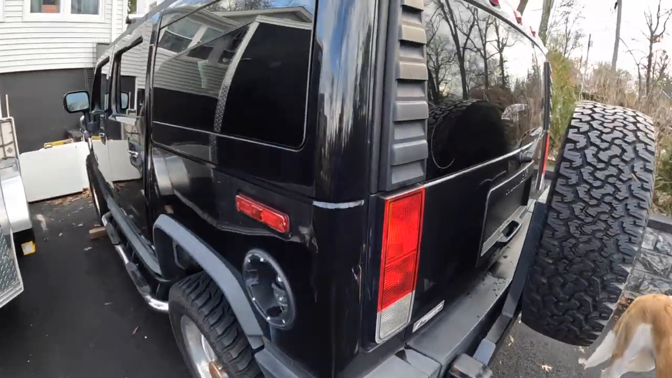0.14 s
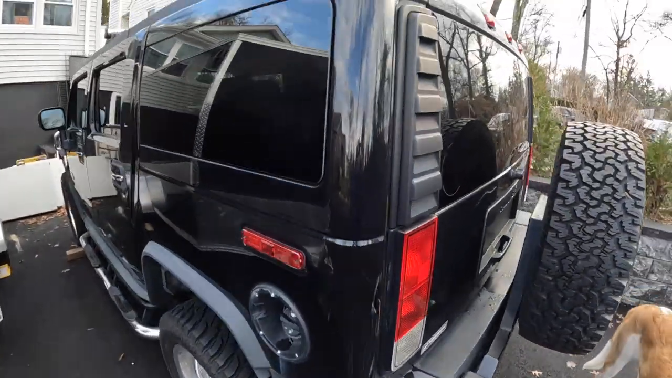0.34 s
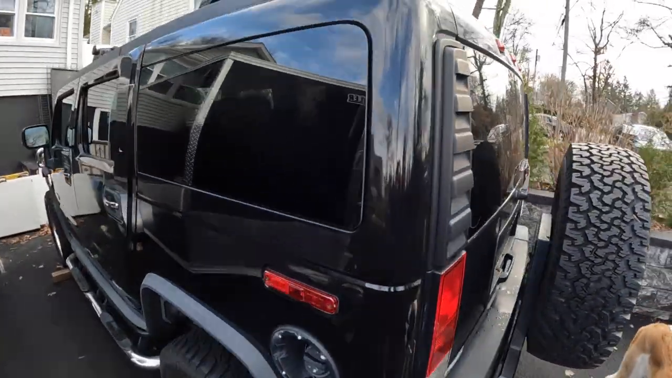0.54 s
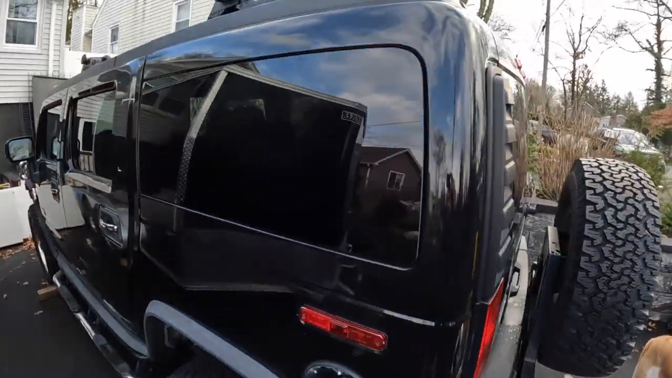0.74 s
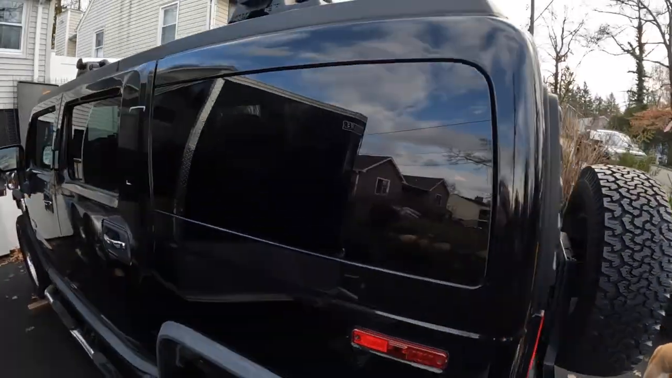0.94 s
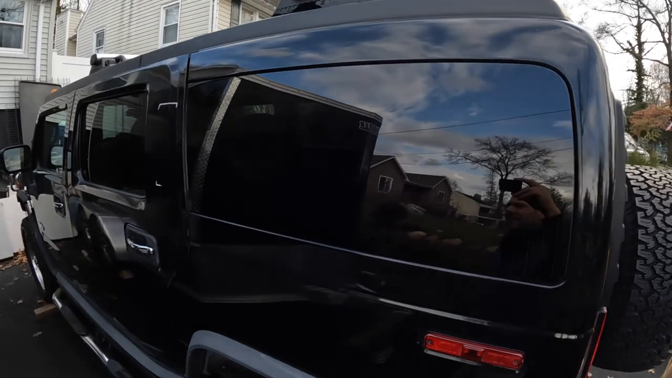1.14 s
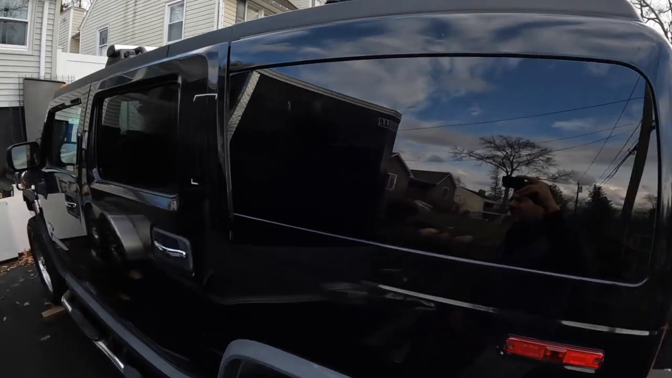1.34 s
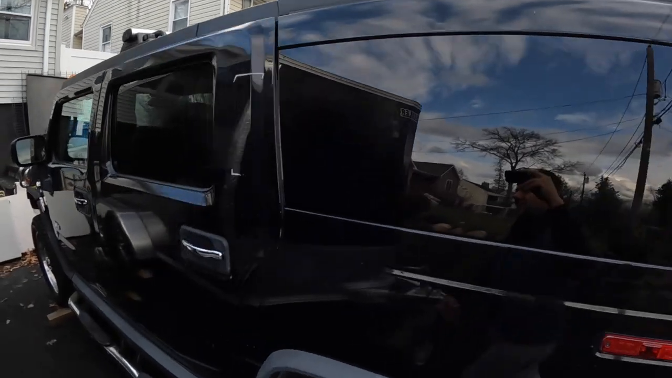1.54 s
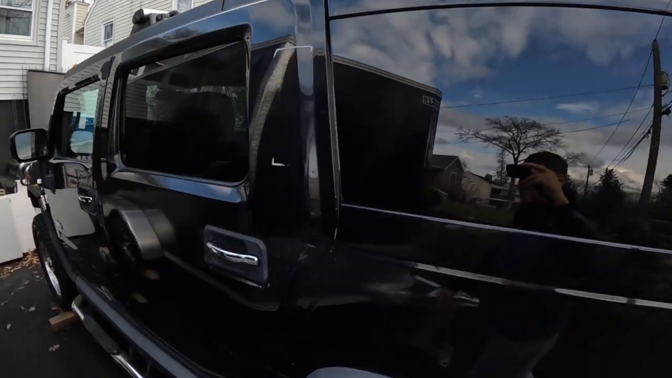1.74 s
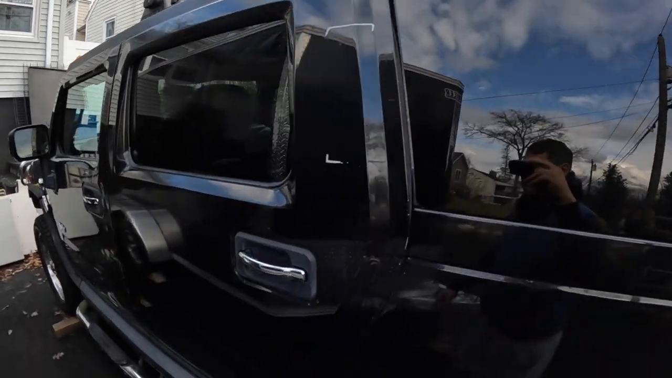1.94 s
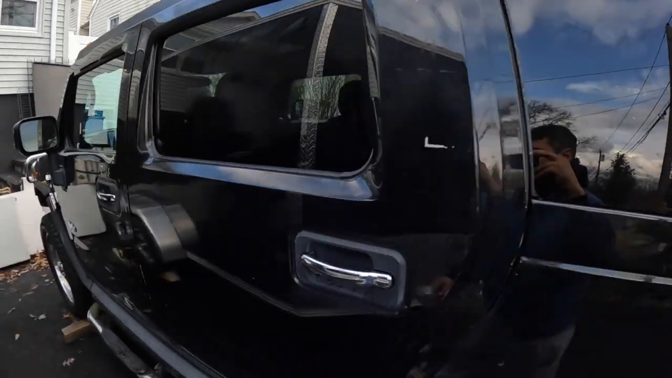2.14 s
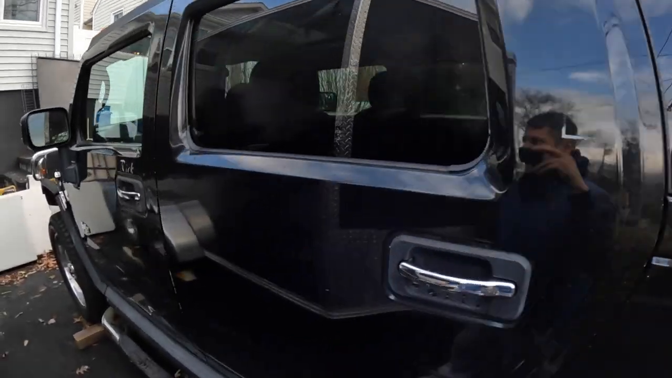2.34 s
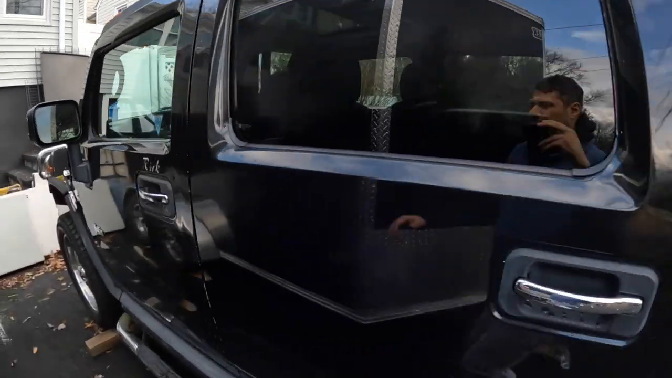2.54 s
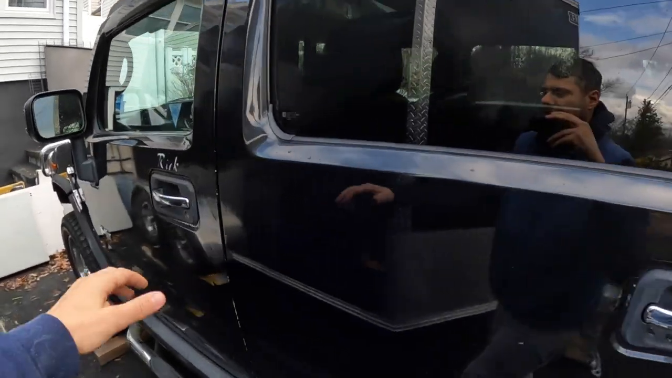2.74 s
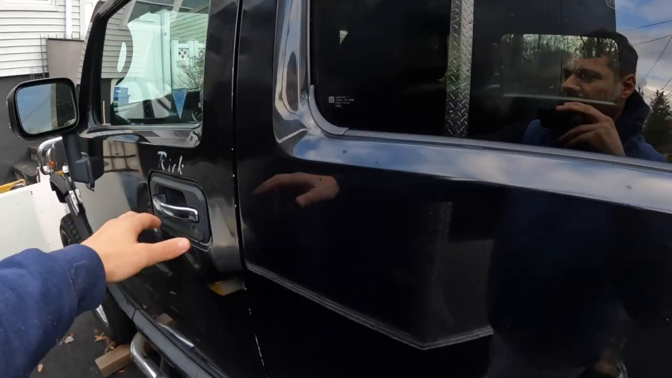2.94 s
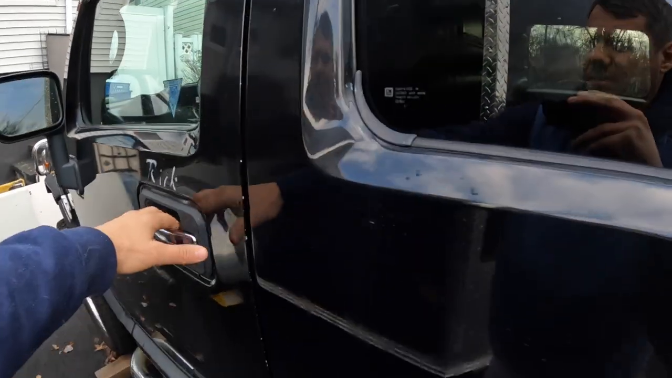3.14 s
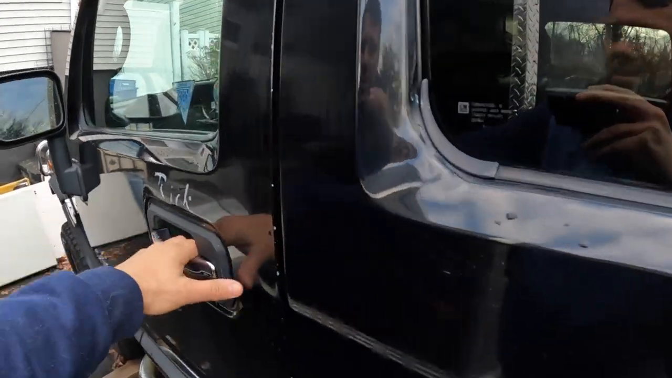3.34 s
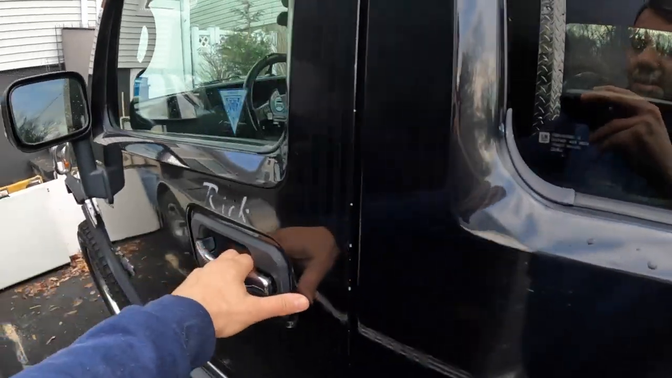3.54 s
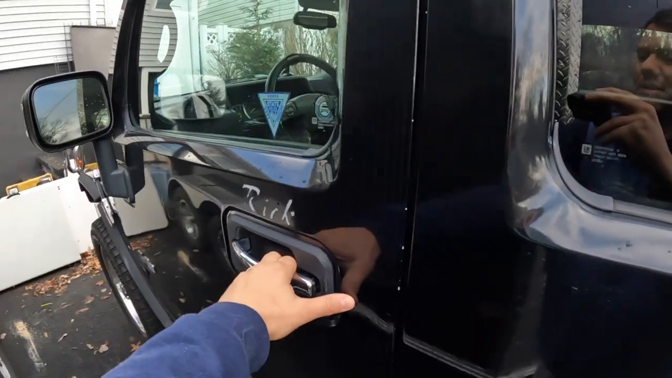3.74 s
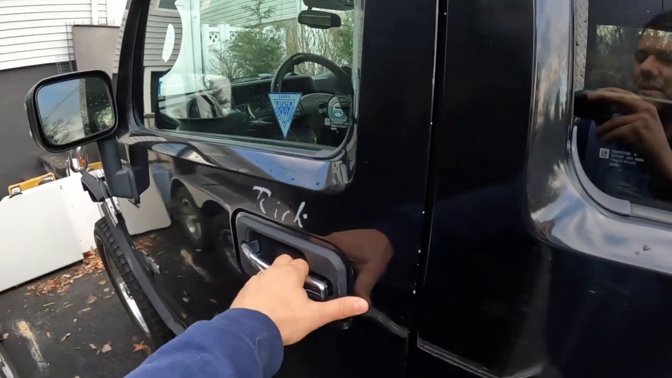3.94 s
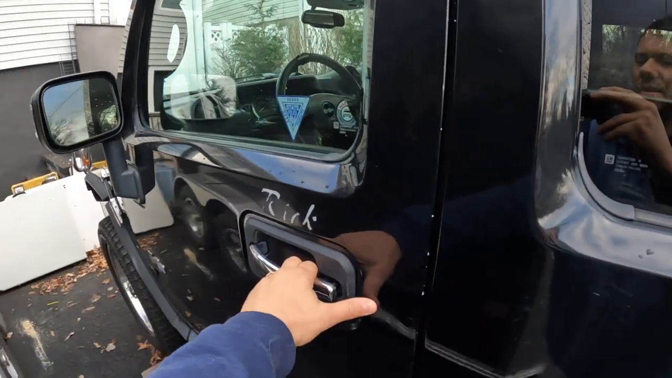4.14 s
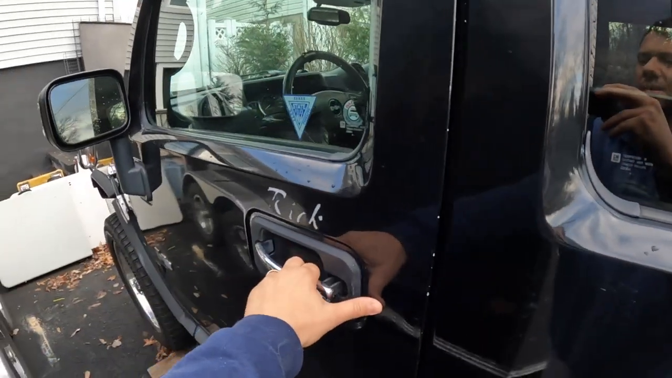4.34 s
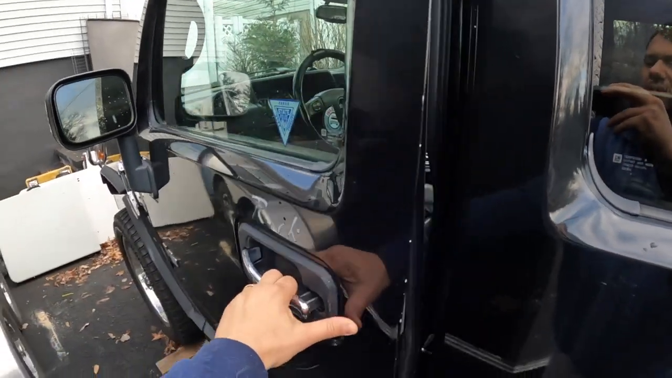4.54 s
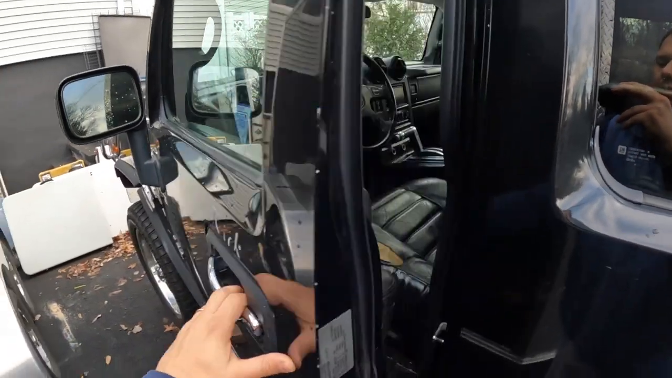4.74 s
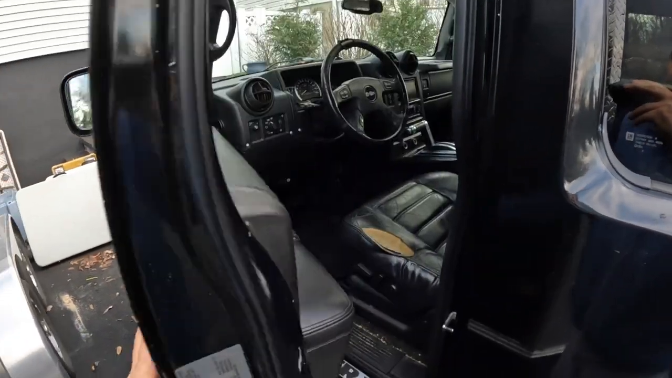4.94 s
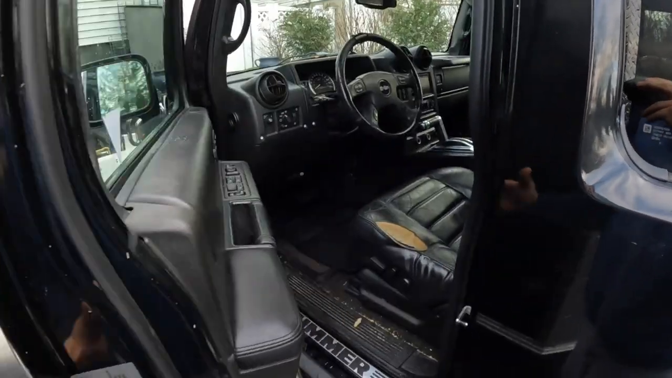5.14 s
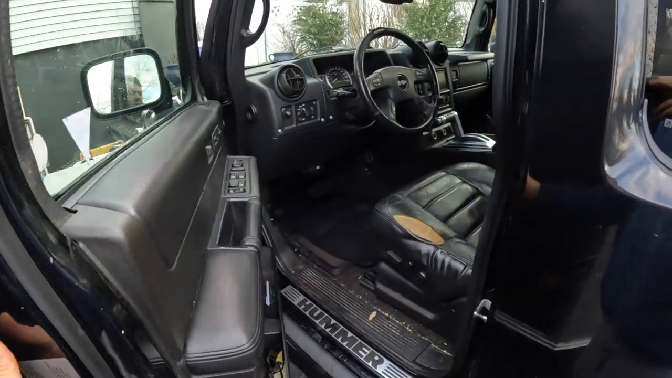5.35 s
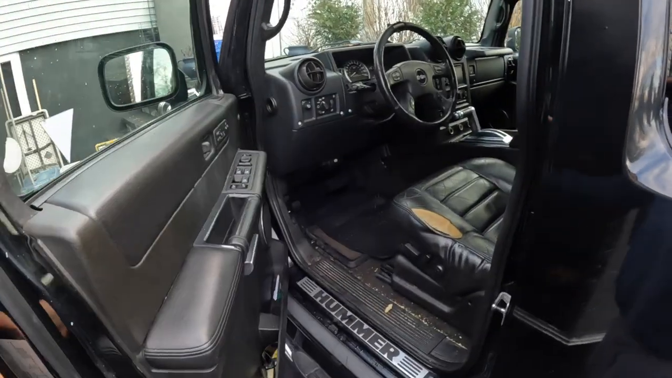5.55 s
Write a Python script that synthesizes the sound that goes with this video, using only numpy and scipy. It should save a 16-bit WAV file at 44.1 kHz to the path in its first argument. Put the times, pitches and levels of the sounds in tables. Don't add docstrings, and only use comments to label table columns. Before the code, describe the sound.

Footsteps crunch dry leaves and twigs beside a large vehicle, then its door handle thumps, the latch springs free and the door swings open over distant traffic.

```python
import sys
import numpy as np
from scipy import signal
from scipy.io import wavfile

SR = 44100
rng = np.random.default_rng(int(sys.argv[2]) if len(sys.argv) > 2 else 0)


def pcm_store(signal):
    levels = np.round(np.clip(np.atleast_2d(signal), -1, 1) * 32767)
    wavfile.write(sys.argv[1], SR, levels.astype(np.int16).T)


def gain_from_db(level_db):
    decades = np.asarray(level_db, float) / 20
    return 10 ** decades


N = 246166


def in_time(rows):
    s, *columns = np.transpose(rows)
    return [np.interp(np.arange(N) / SR, s, c) for c in columns]


def at_hz(points, hz):
    known_hz, value = np.transpose(points)
    return np.interp(np.log(hz), np.log(known_hz), value)


def rms_one(x):
    return x / np.sqrt(np.mean(x ** 2) + 1e-20)


def drift(rate):
    r = np.exp(-80 * np.pi * rate / SR)
    noise = rng.standard_normal(N // 40 + 2002)
    slow = signal.lfilter([1], [1, -2 * r, r * r], noise)[2000:]
    return np.interp(np.arange(N) / 40, np.arange(len(slow)), rms_one(slow))


def ring(x, hz, t60):
    r = gain_from_db(-60 / (t60 * SR))
    w = 2 * np.pi * hz / SR
    return signal.lfilter([0, np.sin(w)], [1, -2 * r * np.cos(w), r * r], x)


def add(out, sound, s, pan_db):
    start = round(s * SR)
    piece = out[:, start:start + len(sound)]
    piece += sound[:piece.shape[1]] * gain_from_db([[pan_db / 2], [-pan_db / 2]])


def grains(size, spread_db):
    uneven = np.minimum(rng.exponential(1, size[-1]), 4)
    return rms_one(rng.standard_normal(size) * gain_from_db(spread_db * uneven))


def coloured(white, spectrum, patchy_db):
    # (frequency [Hz], likeness [-1..1])
    likeness = [(25, 0.77), (60, 1), (180, 0.99), (550, 0.9), (1650, 0.6), (4970, 0.62), (15000, 0.41)]
    edges = 14 * 2 ** np.arange(0, 10.2, .5)
    out, together = 0, drift(1.0)
    lowest_hz, highest_hz = np.array(spectrum)[[0, -1], 0]
    for k, (low, high) in enumerate(zip(edges, edges[1:])):
        hz = np.sqrt(low * high)
        if not lowest_hz * .7 < hz < highest_hz * 1.3:
            continue
        noise = white[k % 2]
        run_in = np.hstack([noise[:, -6000:], noise])
        band = signal.butter(3, [low, high], "band", fs=SR, output="sos")
        mid, side = signal.sosfilt(band, run_in)[:, -N:]
        alike = np.clip(at_hz(likeness, hz), -1, 1)
        gain = gain_from_db(at_hz(spectrum, hz) + patchy_db * (0.1 * together + drift(7.14)))
        out = out + gain * (np.sqrt(1 + alike) * mid + np.sqrt(1 - alike) * side * [[1], [-1]])
    return rms_one(out)


def surges(rows, rise_db_per_s, fall_db_per_s, still_db):
    t, power = np.arange(0, N + 64, 64) / SR, gain_from_db(still_db) ** 2
    for s, hold_s, db in rows:
        rise_db = rise_db_per_s * np.maximum(s - t, 0)
        fall_db = fall_db_per_s * np.maximum(t - s - hold_s, 0)
        power = power + gain_from_db(db - rise_db - fall_db) ** 2
    return np.interp(np.arange(N) / SR, t, np.sqrt(power))


def blows(hits, modes, rattle, pan_db):
    longest_s = max(np.array(hits)[:, 4].max(), np.array(modes)[:, 2].max())
    t = np.arange(int(longest_s * SR)) / SR
    out, shake = np.zeros((2, N)), np.zeros((2, N))
    for s, peak_db, contact_hz, rattle_db, t60 in hits:
        push = t * np.exp(-2 * np.pi * contact_hz * t)
        push = push / push.sum() + 1e-18
        strengths = gain_from_db(np.array(modes)[:, 1] + rng.normal(0, 1.5, len(modes)))
        strengths = strengths * (-1) ** np.arange(len(modes))
        sound = sum(g * ring(push, hz, ring_s) for g, (hz, _, ring_s) in zip(strengths, modes))
        add(out, gain_from_db(peak_db - 8.5) * sound, s, pan_db)
        swell = 1 - np.exp(-contact_hz * t)
        add(shake, swell * gain_from_db(peak_db + rattle_db - 60 * t / max(t60, .005)), s, pan_db)
    return out + shake * rattle


def traffic():
    # (frequency [Hz], density [dB per Hz])
    rumble_colour = [(8.8, -30), (15, 4), (59, -5.5), (75, 0), (102, -10.5), (150, -6), (200, -57.5),
                     (330, -120)]
    drone_colour = [(130, -8.5), (188, 3), (266, -3), (377, -6.5), (533, -13)]
    roar_colour = [(377, -12.5), (533, 3.5), (753, 2), (1065, 0.5), (1500, -8), (2130, -38.5),
                   (3000, -42.5), (4300, -52), (6000, -30.5), (8500, -36.5), (12000, -50.5), (15000, -52.5)]
    # (time [s], roar level [dB])
    road = [(0.0, -50.5), (0.46, -52.5), (0.93, -49), (1.15, -52), (2.27, -52), (2.38, -50), (3.79, -54.5),
            (4.65, -51), (5.11, -55), (5.58, -52.5)]
    # (time [s], rumble level [dB])
    lorry = [(0, -38.5), (.42, -40.5), (.9, -39), (2.8, -38), (3.7, -35.5), (4.1, -39.5), (4.9, -35.5),
             (5.2, -41.5), (5.58, -41.5)]
    # (time [s], hold [s], pitch [Hz], level [dB])
    motor = [
        (0.174, 0.16, 359.4, -48.5),
        (1.445, 0.32, 386.5, -56.5),
    ]
    (roar_db,), (rumble_db,) = in_time(road), in_time(lorry)
    drone_db = -47 + 0.66 * (roar_db - roar_db.mean()) + 0.054 * (rumble_db - rumble_db.mean())
    white = rng.standard_normal((2, 2, N))
    rumble = gain_from_db(rumble_db) * coloured(white, rumble_colour, patchy_db=0.5)
    drone = gain_from_db(drone_db) * coloured(white[::-1], drone_colour, patchy_db=2.0)
    roar = gain_from_db(roar_db - 1.04) * coloured(white, roar_colour, patchy_db=2.0)
    flutter, t, hum = gain_from_db(3.5 * drift(9.4)), np.arange(N) / SR, 0
    for s, hold_s, hz, db in motor:
        level = surges([(s, hold_s, db)], rise_db_per_s=161, fall_db_per_s=250, still_db=-120)
        hum = hum + level * np.sin(2 * np.pi * hz * t)
    halves = np.array([[.5], [-.5]])
    rumble_pan_db, road_pan_db = -0.1, 1.6
    return (rumble + drone) * gain_from_db(rumble_pan_db * halves) + (roar + flutter * hum) * gain_from_db(road_pan_db * halves)


def rustle():
    # (frequency [Hz], density [dB per Hz])
    brush_colour = [(710, -44.5), (1200, -12), (2050, -6), (2280, 1.5), (2570, -7.5), (6370, -11.5),
                    (7170, 3.5), (8790, -21), (12200, -19.5), (15500, -44)]
    # (time [s], hold [s], level [dB], treble over level [dB])
    strokes = [(0, .08, -65, -9), (0.125, 0.18, -68.5, -6), (0.36, 0.076, -64.5, -9),
               (0.475, 0.072, -60, -12), (0.633, 0.19, -72.5, -4.5), (0.834, 0.35, -65, -6.5),
               (1.266, 0.15, -59.5, -13.5), (1.552, 0.012, -68.5, -4), (1.675, 0.17, -62, -10.5),
               (1.9, 0.16, -74.5, -13), (2.124, 0.18, -67, -10), (2.2, 1.04, -86, 11),
               (2.368, 0.062, -60.5, -8), (2.585, 0.33, -62, -8.5), (2.852, 0.17, -62.5, -4),
               (3.043, 0.18, -68.5, -6), (3.342, 0.039, -70.5, 2), (3.48, 0.18, -68, -2.5),
               (3.71, 0.22, -77.5, 1), (4.384, 0.013, -54.5, -11), (4.558, 0.11, -81.5, 6),
               (4.734, 0.13, -55, -6), (4.94, 0.12, -69.5, -0.5), (5.09, .1, -65, -2),
               (5.272, 0.022, -70, -5), (5.384, 0.15, -81.5, -11)]
    rise_db_per_s, fall_db_per_s = 292.5, 219
    body_rows = [(s, hold, db) for s, hold, db, _ in strokes]
    top_rows = [(s, hold, db + over) for s, hold, db, over in strokes]
    level = surges(body_rows, rise_db_per_s, fall_db_per_s, still_db=-81.5)
    treble = surges(top_rows, rise_db_per_s, fall_db_per_s, still_db=-90)
    brush = coloured(grains((2, 2, N), spread_db=5.5), brush_colour, patchy_db=2.5)
    body = signal.sosfilt(signal.butter(6, 8000, fs=SR, output="sos"), brush)
    top = signal.sosfilt(signal.butter(4, 8200, "high", fs=SR, output="sos"), brush)
    return level * gain_from_db(-0.5) * rms_one(body) + treble * gain_from_db(-2.5) * rms_one(top)


def underfoot_events(count=9):
    # (time [s], peak [dB], pitch [Hz], t60 [s])
    leaf_ticks = [(0.0652, -34.5, 2550, 0.03), (0.0798, -49, 2490, 0.013), (0.2617, -45, 5670, 0.019),
                  (0.3137, -44.5, 4700, 0.051), (0.4, -32, 4700, 0.059), (0.41, -30, 5300, 0.017),
                  (0.44, -38, 2700, 0.035), (0.4678, -33, 3330, .041), (0.488, -43, 3050, .03),
                  (0.5353, -34.5, 4100, 0.11), (0.734, -40, 2370, 0.027), (0.7934, -41, 2520, 0.024),
                  (0.803, -36, 2160, 0.022), (.853, -35.5, 3000, 0.022), (1.7228, -35, 4770, 0.04),
                  (2.1676, -35.5, 2260, 0.037), (2.234, -42, 2230, 0.046), (2.2512, -32, 4730, 0.11),
                  (2.374, -34.5, 2330, 0.05), (2.42, -41.5, 5300, 0.095), (2.5, -39, 2500, 0.046),
                  (2.747, -36, 2520, 0.021), (3.1724, -26, 3520, 0.0087), (2.889, -38, 6500, 0.21),
                  (3.5032, -41, 2310, 0.046), (3.993, -41, 2430, 0.0077), (.453, -41, 2900, .02),
                  (1.72, -40, 2500, .02), (2.2, -47, 3000, .03), (2.267, -39, 3500, .08),
                  (2.384, -35, 5000, .04), (2.397, -43, 4500, 0.036), (2.435, -43, 4500, 0.065),
                  (2.847, -43, 2400, .04), (2.93, -41, 2600, .02), (2.65, -44, 2400, 0.033),
                  (5.414, -50.5, 2500, 0.012)]
    # (time [s], peak [dB], pitch [Hz], t60 [s])
    twig_snaps = [(0.339, -49, 3180, 0.26), (1.844, -44, 2700, 0.054), (2.479, -34, 2640, 0.037),
                  (2.613, -39, 2550, 0.019), (3.026, -42, 2000, 0.024), (3.1153, -31.5, 2450, 0.034),
                  (3.569, -51, 2180, 0.044), (3.6594, -53, 2340, .03), (5.1677, -39.5, 3220, .033)]
    # (time [s], peak [dB], pitch [Hz], treble [dB])
    grit_snaps = [(0.125, -54, 5100, -2), (0.1942, -51, 5600, 1), (.2044, -63, 6000, 4),
                  (0.2514, -42.5, 5750, -6.5), (0.713, -48.5, 4600, -13), (1.067, -38, 7300, -16),
                  (1.0876, -45, 7130, -14), (1.103, -39, 7500, -18), (1.136, -54, 7000, -4),
                  (2.8833, -13.5, 7500, -19), (2.996, -40, 3450, -14), (3.194, -41, 2980, -19)]
    # (start [s], swell [s], fall [s], peak [dB], pitch [Hz])
    crushes = [
        (0.878, 0.011, .022, -19.5, 3960),
        (0.9675, 0.029, 0.016, -21.5, 5500),
        (1.671, 0.0099, 0.0071, -35, 5000),
    ]
    leaf_attack_s, snap_attack_s, leaf_reach = 0.00019, .0001, 4.2
    rows = [(s, db, hz, -16.5, -30, t60, leaf_attack_s, leaf_reach) for s, db, hz, t60 in leaf_ticks]
    rows += [(s, db, hz, -2.5, -40, t60, snap_attack_s, 1.5) for s, db, hz, t60 in twig_snaps]
    for s, db, hz, treble_db in grit_snaps:
        crunch_db = -12 - 10 * np.log2(hz / 2500)
        rows.append((s, db, hz, crunch_db, treble_db, 0.021, snap_attack_s, 1.3))
    for s, swell_s, fall_s, db, hz in crushes:
        end_s = swell_s + fall_s
        for late, bend in zip(np.linspace(0, end_s, count), rng.normal(0, 0.6, count)):
            loss_db = np.interp(late, [0, swell_s, end_s], [16, 0, 26])
            rows.append((s + late, db - loss_db, hz * np.exp(bend), -17, -17.5, 0.071,
                         leaf_attack_s, leaf_reach))
    return rows


def cracks():
    out, t = np.zeros((2, N)), np.arange(5000) / SR
    crunch_band = signal.butter(2, [950, 1750], "band", fs=SR, output="sos")
    body_band = np.vstack([signal.butter(4, [1800, 9500], "band", fs=SR, output="sos"),
                           signal.cheby2(8, 30, 8700, fs=SR, output="sos")])
    edge_band = signal.butter(3, [8000, 15500], "band", fs=SR, output="sos")
    for s, peak_db, hz, crunch_db, treble_db, t60, attack_s, reach in underfoot_events():
        fade = gain_from_db(-60 * t / max(t60, .004))
        first_snap = 3.3 * np.exp(-t / 0.00017)
        swarm = grains((len(t),), spread_db=3.5) * (fade + first_snap)
        swarm = swarm * (1 - np.exp(-t / max(attack_s, 2e-5)))
        splinters = signal.sosfilt(signal.butter(2, min(reach * hz, 15000), fs=SR, output="sos"), swarm)
        body = signal.sosfilt(body_band, 0.79 * splinters + 0.21 * ring(swarm, hz, 5.7 / hz))
        crunch = gain_from_db(crunch_db + 18.0) * signal.sosfilt(crunch_band, swarm)
        edge = gain_from_db(treble_db + 6.0) * signal.sosfilt(edge_band, swarm)
        add(out, gain_from_db(peak_db - 8.5) * (body + crunch + edge), s + .0008, rng.normal(2.9, 3.8))
    return out


def loose_contacts():
    # (frequency [Hz], density [dB per Hz])
    dull_colour = [(377, 3), (533, 1), (753, -6), (1065, -14), (1500, -14.5), (2130, -23.5), (3000, -49.5),
                   (4300, -40.5), (8500, -48.5), (12000, -53.5)]
    bright_colour = [(240, 1.5), (400, -1), (886, -5), (1240, 0), (1590, -12.5), (2190, -10), (3850, -16.5),
                     (7000, -22), (8800, -35.5), (12500, -40), (15500, -60)]
    contacts = grains((2, 2, N), spread_db=4.0)
    dull = coloured(contacts, dull_colour, patchy_db=3.5)
    bright = coloured(contacts, bright_colour, patchy_db=4.5)
    return contacts, dull, bright


def soles(bright):
    # (time [s], peak [dB], contact hardness [Hz], rattle [dB], rattle t60 [s])
    heel = [(0.8873, -22.5, 2200, -16, 0.014), (0.8895, -26, 2200, -22, .02),
            (0.8955, -16, 2520, -18.5, 0.021), (0.903, -29, 2000, -16.5, 0.11),
            (0.9696, -27, 2000, -9, .02), (0.9776, -23.5, 2000, -14, 0.017), (0.993, -25, 2000, -14, .02),
            (1.679, -34, 2500, -14, .02), (3.1165, -34, 3000, -2.5, 0.035)]
    toe = [
        (0.9851, -21.5, 4000, -13, .02),
        (0.9916, -34, 4000, -21, .02),
        (0.997, -24, 6000, -16, 0.027),
        (1.001, -27, 6000, -19, 0.028),
        (1.007, -29.5, 6000, -8.5, 0.047),
        (1.6845, -29.5, 8000, -23, .02),
    ]
    # (pitch [Hz], level [dB], t60 [s])
    heel_modes = [(940, -1.5, 0.024), (1200, 1, 0.017), (1493, 0.5, 0.034), (2000, -6.5, 0.018),
                  (3540, 3, 0.014), (4200, 1, 0.011)]
    toe_modes = [(2000, 0.5, 0.02), (2667, -4, .03), (5430, -2.5, 0.016), (6300, -2, 0.018),
                 (7500, 0.5, 0.017), (12100, -2, 0.01)]
    return blows(heel, heel_modes, bright, pan_db=5.0) + blows(toe, toe_modes, bright, pan_db=4.5)


def handle(dull):
    # (time [s], peak [dB], contact hardness [Hz], rattle [dB], rattle t60 [s])
    grip = [
        (3.505, -21, 493, -42, 0.045),
        (3.519, -24.5, 505, -52, .05),
        (3.647, -22.5, 700, -43, .05),
        (3.666, -29, 500, -42, .05),
    ]
    pull = [
        (4.3755, -9.5, 496, -12, 0.079),
        (4.381, -1.5, 930, -25.5, 0.11),
        (4.3845, -8.5, 910, -27, 0.45),
        (4.404, -19, 5000, -15, 0.14),
        (4.407, -11.5, 250, -31, 0.089),
        (4.44, -13.5, 353, -35, 0.053),
        (4.488, -24, 1200, -20, 0.053),
    ]
    knock = [
        (4.501, -22.5, 600, -14, 0.059),
        (4.509, -28, 600, -18.5, 0.089),
    ]
    # (pitch [Hz], level [dB], t60 [s])
    grip_modes = [(146, -7.5, 0.14), (190, 0.5, 0.15), (307, -1, 0.042), (400, -2, 0.068),
                  (456, -35, 0.036)]
    pull_modes = [(65, 1.5, 0.14), (33.4, -7, 0.1), (93.5, -6, 0.64), (200, -3.5, 0.056), (258, -6.5, 0.07),
                  (299, 1.5, 0.036), (400, -16, 0.086), (530, -15, 0.055), (1010, -1, 0.023),
                  (1210, -19, 0.059), (1377, -9.5, 0.071), (1500, -17, 0.051), (2450, -16, 0.036),
                  (3050, -14.5, 0.041),
                  (334, 1, 0.038), (470, -20, 0.042), (670, -13, 0.063), (834, -23, .06)]
    knock_modes = [(380, 4.5, 0.057), (430, -9.5, 0.09)]
    out = blows(grip, grip_modes, dull, pan_db=0.5)
    out += blows(pull, pull_modes, dull, pan_db=-0.1)
    return out + blows(knock, knock_modes, dull, pan_db=-1.0)


def linkage(contacts):
    # (time [s], level [dB])
    slide = [(4.351, -74), (4.372, -66), (4.44, -49), (4.47, -73), (4.489, -58), (4.51, -77), (4.53, -60.5),
             (4.64, -62.5), (4.69, -78.5)]
    level_db, = in_time([(slide[0][0] - .02, -110), *slide, (slide[-1][0] + .02, -110)])
    band = signal.butter(3, [1300, 3150], "band", fs=SR, output="sos")
    scrape = signal.sosfilt(band, contacts[0] + 2 * contacts[1, 0])
    return gain_from_db(level_db) * rms_one(scrape)


def latch(bright):
    # (time [s], peak [dB], contact hardness [Hz], rattle [dB], rattle t60 [s])
    release = [(4.708, -25, 1200, -14.5, 0.27), (4.7285, -19, 4000, -6.5, 0.081),
               (4.7317, -12, 3880, -7, 0.12), (4.737, -12, 2000, -14.5, 0.089),
               (4.7425, -11, 12100, -22.5, 0.06), (4.745, -11, 9000, -30.5, 0.17),
               (4.750, -15, 2950, -18, 0.22), (4.757, -40, 2000, -32, .12),
               (4.775, -14.5, 1500, -34, 0.049), (4.800, -38, 2500, -19, 0.51),
               (4.764, -27.5, 4000, -22, 0.11)]
    ticks = [
        (4.7007, -34, 6000, -3, 0.084),
        (4.8665, -33, 5000, -6, 0.031),
        (4.897, -44, 3000, -10, .03),
        (4.9135, -38, 3000, -7, 0.034),
    ]
    # (pitch [Hz], level [dB], t60 [s])
    release_modes = [(334, -7, 0.19), (397, -15, 0.23), (886, -13.5, .15), (1100, -7.5, 0.077),
                     (505, -1, 0.17), (571, -3, 0.1), (650.5, -7.5, 0.16), (943, -14, 0.22),
                     (1180, -10, 0.059), (1530, -8.5, 0.03), (2280, -10.5, 0.08), (1980, -16.5, .05),
                     (2963, -7.5, .065), (3190, -8.5, 0.037),
                     (3730, -1.5, 0.024), (4210, -13, 0.13), (4780, -20.5, .1), (5720, -16.5, 0.085),
                  (4150, 3.5, 0.0071), (5300, -6, 0.025), (6500, -1, 0.0123), (9000, -5.5, 0.0081),
                  (10600, -3.5, 0.0046), (12100, 1.5, 0.0054)]
    tick_modes = [(1370, -11, 0.022), (2130, 0, 0.022), (3000, -3, .03), (3450, -3, 0.019),
                  (5000, -9, .015)]
    out = blows(release, release_modes, bright, pan_db=1.6)
    return out + blows(ticks, tick_modes, bright, pan_db=-0.7)


def panel(dull):
    # (time [s], peak [dB], contact hardness [Hz], rattle [dB], rattle t60 [s])
    heave = [
        (4.732, -18, 200, -41, .05),
        (4.76, -26, 200, -40.5, .05),
        (4.78, -10.5, 200, -42.5, .05),
    ]
    boom = [
        (4.7625, -11, 500, -45, 0.056),
        (4.768, -13.5, 505, -31.5, .05),
        (4.785, -20, 400, -12.5, 0.21),
    ]
    # (pitch [Hz], level [dB], t60 [s])
    heave_modes = [(54.5, 1.5, 0.12), (72.4, 8.5, 0.19), (87, 7.5, 0.09)]
    boom_modes = [(138, -8.5, 0.2), (167, -7, 0.18), (214, 5.5, 0.12), (297, -9.5, 0.17)]
    return blows(heave, heave_modes, dull, pan_db=3.2) + blows(boom, boom_modes, dull, pan_db=0.5)


def check_strap(bright):
    # (time [s], peak [dB], contact hardness [Hz], rattle [dB], rattle t60 [s])
    clicks = [
        (5.4435, -50, 1500, -12, 0.08),
        (5.4645, -23, 2530, -42, 0.039),
        (5.4665, -22.5, 4000, -13.5, 0.1),
        (5.478, -19, 795, -26.5, 0.079),
        (5.551, -34, 500, -32, 0.077),
    ]
    # (pitch [Hz], level [dB], t60 [s])
    strap_modes = [(102.5, -3.5, 0.25), (207, -5.5, 0.16), (512, -9, 0.077), (660, 7, 0.02),
                   (830, 13.5, 0.01), (990, 8, 0.019), (1864, -5, 0.038), (2550, -4, 0.016),
                   (2740, -3, 0.086), (5500, -4, 0.029), (7250, -1, 0.015), (9300, -8, .015),
                   (11650, -7, .015)]
    return blows(clicks, strap_modes, bright, pan_db=0.7)


def yard(x):
    t60_s, level_db, first_echo_s = 0.15, -10, 0.0041
    t = np.arange(12000) / SR
    tail = grains((2, len(t)), spread_db=4.5) * gain_from_db(-60 * t / t60_s) * (t > first_echo_s)
    tail = signal.sosfilt(signal.butter(4, 7800, fs=SR, output="sos"), tail)
    tail = gain_from_db(level_db) * (tail + 0.37 * tail[::-1]) / np.sqrt(np.sum(tail ** 2))
    return signal.oaconvolve(x.mean(axis=0)[None], tail, axes=1)[:, :N]


def scene():
    steady = traffic() + rustle()
    contacts, dull, bright = loose_contacts()
    underfoot = cracks() + soles(bright)
    door = handle(dull) + linkage(contacts) + latch(bright) + panel(dull) + check_strap(bright)
    echoes = yard(underfoot + gain_from_db(-13.5) * door)
    return underfoot + door + echoes + steady


def low_pass(x):
    return signal.sosfilt(signal.butter(12, 15790, fs=SR, output="sos"), x)


def record(dry):
    dry = signal.sosfilt(signal.butter(1, 18, "high", fs=SR, output="sos"), dry)
    top = signal.sosfiltfilt(signal.butter(3, 10300, "high", fs=SR, output="sos"), dry)
    dry = dry + 0.42 * top * [[1], [-1]]
    dry = 0.16 * dry + signal.sosfilt(signal.cheby2(8, 40, 13600, fs=SR, output="sos"), dry)
    mix = signal.sosfilt(signal.cheby2(10, 60, 15900, fs=SR, output="sos"), dry)
    return low_pass(mix)


dry = scene()
out = record(dry)
pcm_store(out)
```